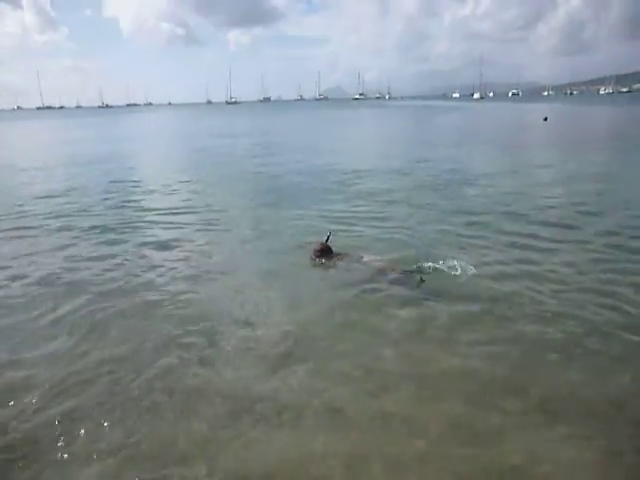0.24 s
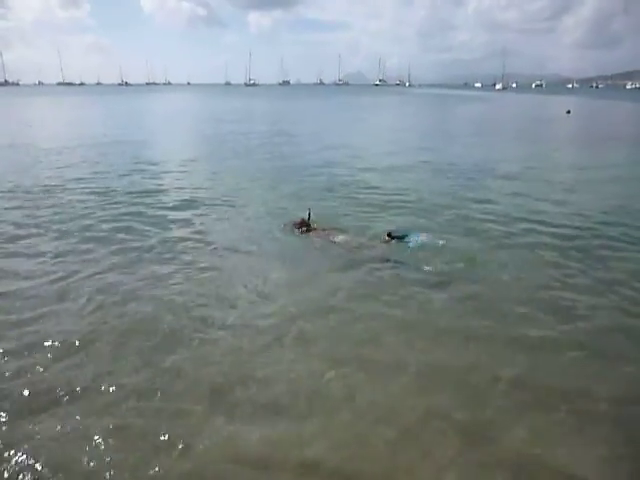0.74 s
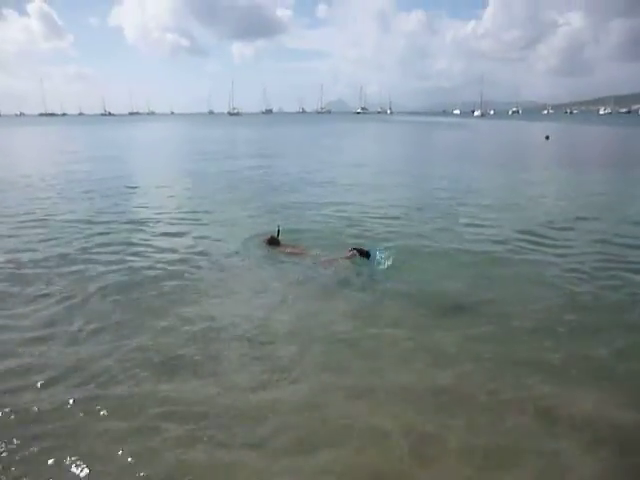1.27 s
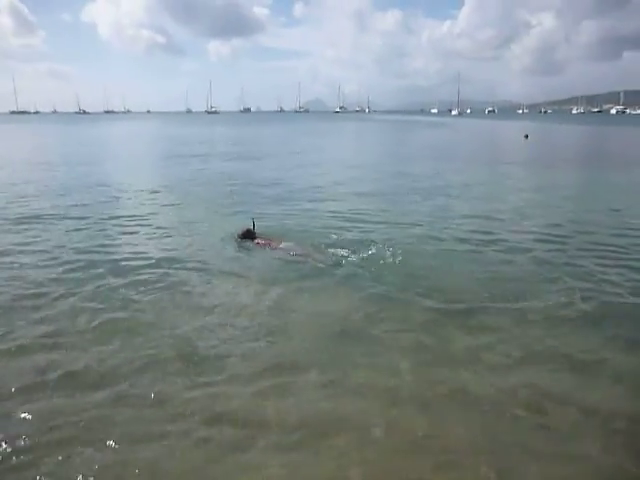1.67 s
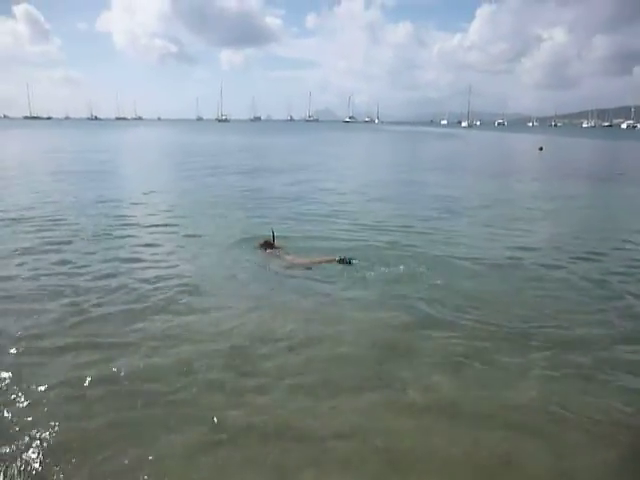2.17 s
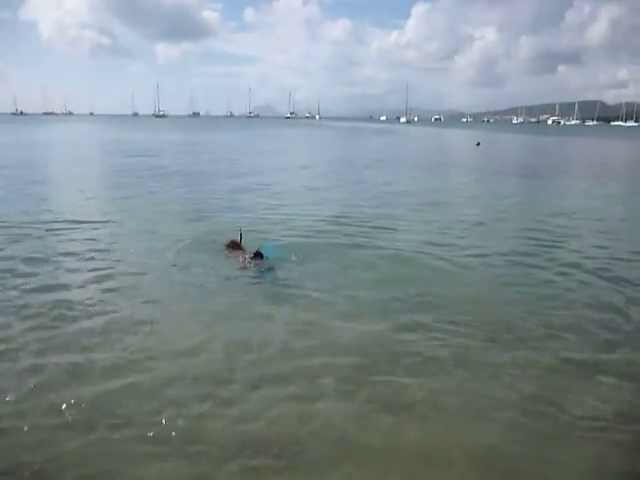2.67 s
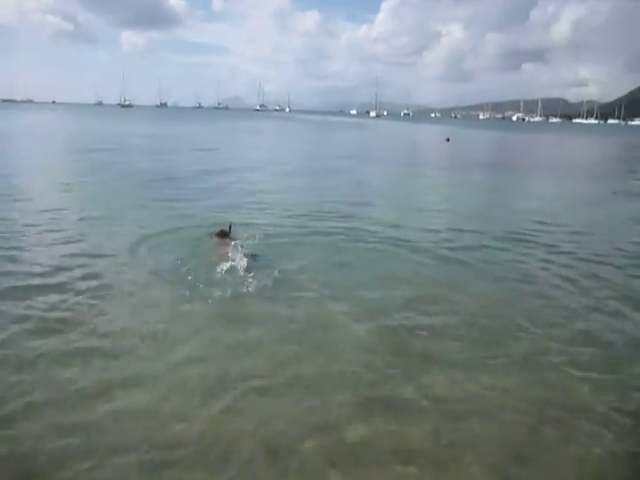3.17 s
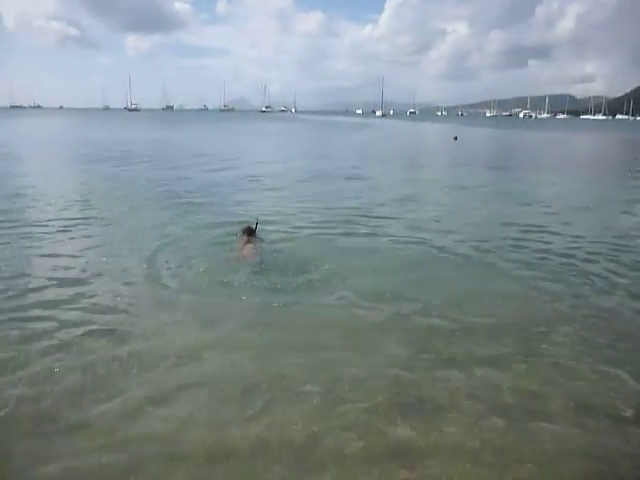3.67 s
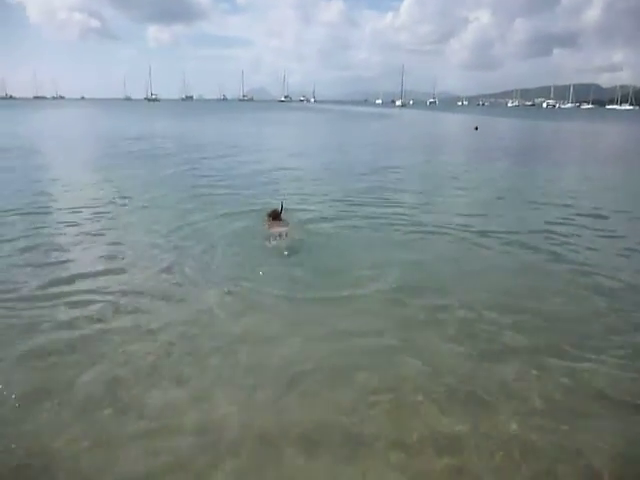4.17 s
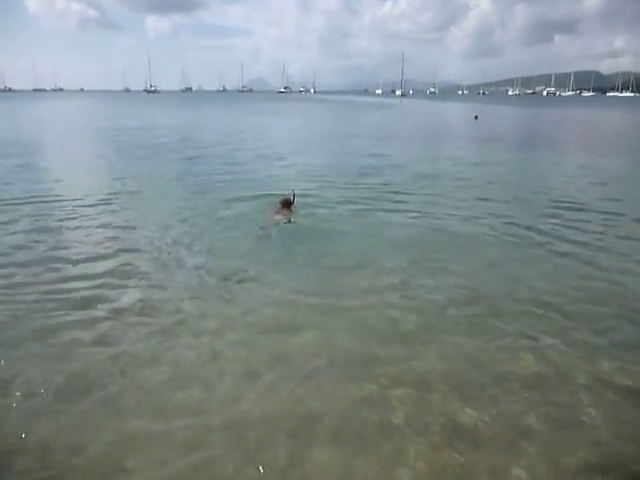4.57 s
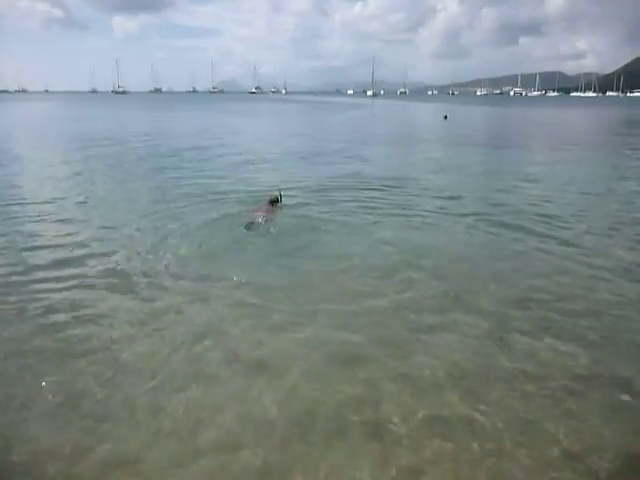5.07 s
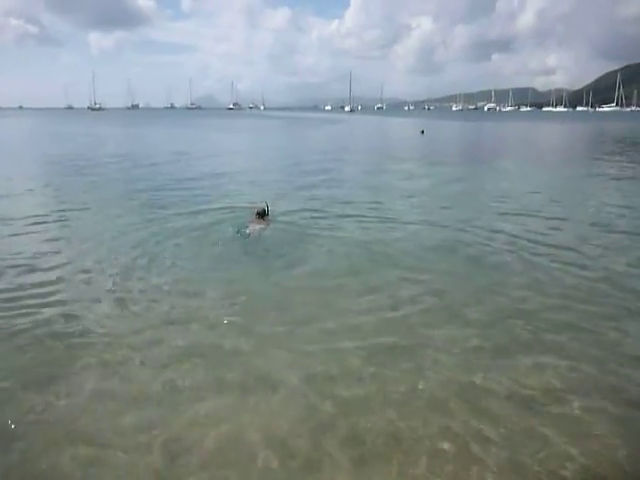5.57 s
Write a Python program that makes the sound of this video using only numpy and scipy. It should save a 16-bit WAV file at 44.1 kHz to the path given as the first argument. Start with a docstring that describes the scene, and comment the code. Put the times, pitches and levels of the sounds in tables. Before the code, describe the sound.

A small wave laps in, bubbling and gurgling, with a few round plops close by. It breaks about halfway through in a brief splash, spray ticks and crackling foam. Then the water recedes to a quieter trickle and rough, low wind blows batter one outdoor microphone in short bursts. The sound is dry, mono and without echo, its highest treble dulled.

```python
"""A small wave washes up a sheltered beach: decaying sine bubbles gurgle and splash, shaped noise and clicks fizz.
A few big bubbles plop close by as swelling sines of rising pitch; then the wave breaks amid ticks of spray.
As the water calms, gusts of low-pitched noise and single swinging eddies buffet the one microphone,
and the hardest blows make the camera turn its gain down for a moment.
Near the end a faint hollow tone, a wavering sine, sinks under the draining water."""
import sys
import numpy as np
from scipy.fft import rfft, irfft, next_fast_len
from scipy.io import wavfile
from scipy.ndimage import uniform_filter1d, minimum_filter1d, map_coordinates

SR = 44100
rng = np.random.default_rng(int(sys.argv[2]) if len(sys.argv) > 2 else 0)


def generate_wav(sig):
    """Save sig (samples, or channels by samples) to the path in sys.argv[1] as 16-bit PCM at SR."""
    pcm = np.round(np.clip(np.atleast_2d(sig).T, -1, 1) * 32767).astype(np.int16)
    wavfile.write(sys.argv[1], SR, pcm)


N = 256750

# strength and foaminess of the flow: (time [s], relative level [dB], foaminess [dB])
FLOW = [(0, -32, 0), (0.42, -31.5, -0.3), (0.6, -31, -2), (1.0, -30.5, -.5), (1.55, -30, -0.2),
        (1.92, -32.5, 0), (2.3, -31.5, 1), (3.15, -32, 2), (3.45, -33.5, 0.2), (4.05, -36.5, 0.5),
        (4.35, -41, 1.1), (4.65, -43.5, 1.5), (5.2, -42, 0.1), (5.82, -40, -3)]
# middle pitch of the bubbles in the wave front: (time [s], frequency [Hz])
FRONT_PITCH = [(0, 911), (1.5, 856), (2.3, 750), (2.9, 1025), (4.6, 1120), (5.82, 1002)]
# ripples that lap and trap air: (time [s], lift of the gurgle [dB])
LAPS_TRAPPING_AIR = [(.97, 2.5), (1.17, 2.5), (2.42, 2), (2.72, 4), (3.17, 3), (3.32, 3)]
# spectrum of the gurgling noise: (frequency [Hz], relative density [dB per Hz])
GURGLE_SPECTRUM = [(40, -38), (80, -35), (120, -14.5), (190, -16), (270, -5.5), (400, -3), (560, -4.5),
                   (800, -7.5), (1600, -56.5)]
# spectrum of the hissing foam, also the filter of its spray: (frequency [Hz], relative level [dB])
FOAM_SPECTRUM = [(300, -10), (800, 6), (1500, 3), (2100, 2), (3000, -2.5), (4500, -6), (6500, -11.5),
                 (9000, -13.5)]
# filter that colours the clicks of bursting films: (frequency [Hz], relative level [dB])
BURST_SPECTRUM = [(800, -7), (2500, -12), (5000, 8.5), (8000, 6)]
# wind between gusts: (time [s], relative level [dB])
BREEZE_LEVEL = [(0, -46.5), (1.1, -49.5), (2.0, -52), (3.0, -53), (3.6, -39), (4.22, -46.5), (4.55, -27.5),
                (4.75, -36), (5.3, -34.5), (5.82, -46)]
# gusts: (time of peak [s], relative level [dB], half-length [s])
GUST_SWELLS = [(2.738, -25, .022), (3.187, -33, 0.054), (3.388, -28, 0.032), (3.99, -30, 0.016),
               (4.404, -26, 0.019), (4.49, -21, .025), (4.612, -21.5, 0.031), (4.84, -25.5, 0.016),
               (4.982, -30, 0.022), (5.164, -22.5, 0.11), (5.433, -24.5, .025), (5.722, -35.5, 0.036)]
# spectrum of turbulence on the microphone: (frequency [Hz], relative density [dB per Hz])
BUFFET_SPECTRUM = [(12, -18.5), (30, -11.5), (55, -5), (95, -1), (180, 1.5), (300, -7.5), (450, -14),
                   (900, -35.5), (2500, -67.5)]
# the strongest eddies: (time of peak [s], relative level [dB], centre frequency [Hz])
STRONG_EDDIES = [(3.337, -11, 226), (3.99, -19.5, 150), (4.391, -15, 138), (4.408, -10, 119),
                 (4.449, -12, 140), (4.486, -9.5, 375), (4.502, -3.5, 257.5), (4.635, -13.5, 417),
                 (4.641, -6, 153.6), (5.001, -10.5, 125), (5.158, -12.5, 120), (5.257, -1, 162),
                 (5.501, -12.5, 186)]
# near bubbles: (time of onset [s], relative level [dB], frequency [Hz], time scale of the ring [s])
NEAR_BUBBLES = [(.772, -9, 775, 0.014), (1.510, -7, 850, 0.012), (1.704, -11, 1830, 0.01),
                (1.730, -12, 797, 0.045), (1.819, -14, 263, 0.019), (2.122, -14, 660, 0.019),
                (2.365, -7, 1040, 0.012), (2.926, -9.5, 720, 0.014), (2.998, -11, 944, 0.012),
                (4.128, -20, 468, 0.03), (4.458, -22, 1404, 0.018), (4.875, -7, 890, .009),
                (4.876, -15.5, 495, 0.01), (5.378, -20, 1460, 0.01)]
# drops slapping the surface: (time [s], relative level [dB])
DROPS = [(2.24, -20), (2.606, -21), (3.272, -20.5), (3.935, -25.5), (4.042, -18.5), (4.097, -25),
         (4.281, -28.5)]
# the camera's treble response: (frequency [Hz], level [dB])
TREBLE_RESPONSE = [(6500, 1.5), (7300, -4), (8200, -14), (8700, -27), (9100, -39.5)]

GURGLE_DB, SPLASH_DB, FIZZ_DB = -1.17, -2, -0.17  # each layer over the flow
FOAM_DAMPING = 0.7  # dB of splash lost for each dB of foaminess
LAP_S = 0.072  # half-length of a lap
POCKET_RATIO = 0.3907  # pitch of the big air pockets over that of the front
# as the wave breaks, its front splashes down, then the foam bursts
BREAK_S, SPLASH_AFTER_S, FIZZ_AFTER_S = 2.706, 0.13, 0.43
BREAK_SPLASH_DB, BREAK_SPLASH_S = 7.2, 0.22  # lift and half-length of the splash
BREAK_FIZZ_DB, BREAK_FIZZ_S = 3.8, 0.11  # lift and half-length of the fizz
FLUTTER_DB, FLUTTER_HZ = -14.5, 332  # level over the gusts, centre of the resonance
EDDY_CYCLES = 1.08  # half-length of an eddy
SPATTER_HZ, SPATTER_DECAY_S = 1850, 0.006  # centre and decay of each tick
HOLLOW_S, HOLLOW_LENGTH_S, HOLLOW_DB = 5.68, 0.11, -41.5  # middle, half-length, mean level
HOLLOW_HZ, HOLLOW_SAG_HZ_PER_S = 309, 150  # pitch at the middle, and how fast it sinks
CEILING_DB, SENSE_S, RECOVERY_DB_PER_S = -15, 0.004, 6.5  # gain control
TOP_HZ = 9100  # band limit


def amp(db):
    """A level in decibels is the logarithm of an amplitude ratio; this inverts it."""
    return 10 ** (np.asarray(db) / 20)


def unit(x):
    """Equal rms means equal mean power: x is scaled to rms 1."""
    return x / np.sqrt(np.mean(x ** 2) + 1e-20)


def curves(rows):
    """Linear interpolation gives one value per sample for each column after the time."""
    s, *columns = np.transpose(rows)
    return [np.interp(np.arange(N) / SR, s, column) for column in columns]


def wobble(rate):
    """Random knots, rate of them a second, joined by a spline give a smooth fluctuation."""
    knots = rng.standard_normal(int(N * rate / SR) + 4)
    return map_coordinates(knots, [np.arange(N) * rate / SR])


def swell(s, length):
    """A Gaussian envelope rises to 1 at time s and falls to 1/e a half-length away."""
    return np.exp(-((np.arange(N) / SR - s) / length) ** 2)


def filtered(x, response):
    """Linear filtering multiplies the spectrum of x by a response of frequency."""
    size = next_fast_len(N + SR // 2)
    return irfft(rfft(x, size) * response(np.fft.rfftfreq(size, 1 / SR)), size)[:N]


def coloured(x, spectrum):
    """A response interpolated on a log-frequency axis colours x, at rms 1."""
    f, db = np.transpose(spectrum)
    return unit(filtered(x, lambda hz: amp(np.interp(np.log(hz + 1), np.log(f), db))))


def noise(spectrum):
    """White noise takes the colour of its filter, at rms 1."""
    return coloured(rng.standard_normal(N), spectrum)


def resonant(x, centre_hz, sharpness, order):
    """A broad resonance weakens x on either side of its centre, at rms 1."""
    ratio = (np.fft.rfftfreq(x.shape[-1], 1 / SR) + 1) / centre_hz
    response = 1 / np.hypot(1, sharpness * (ratio - 1 / ratio)) ** order
    return unit(irfft(rfft(x) * response, x.shape[-1]))


def placed(starts, grains):
    """Superposition: the rows of grains add, each beginning at its time."""
    first = np.round(np.maximum(starts, 0) * SR).astype(int)
    index = first + np.arange(grains.shape[1])
    return np.bincount(index.ravel(), grains.ravel(), N)[:N]


def wash_levels():
    """The flow drives gurgle, splash and fizz; foam muffles the splash; laps and the break lift them in turn."""
    flow_db, foam_db = curves(FLOW)
    laps_db = sum(db * swell(s, LAP_S) for s, db in LAPS_TRAPPING_AIR)
    fall_db = BREAK_SPLASH_DB * swell(BREAK_S + SPLASH_AFTER_S, BREAK_SPLASH_S)
    burst_db = BREAK_FIZZ_DB * swell(BREAK_S + FIZZ_AFTER_S, BREAK_FIZZ_S)
    gurgle_db = flow_db + GURGLE_DB + laps_db
    splash_db = flow_db + SPLASH_DB - FOAM_DAMPING * foam_db + fall_db
    fizz_db = flow_db + FIZZ_DB + foam_db + burst_db
    return gurgle_db, splash_db, fizz_db


def bubbles(centre_hz, spread, cycles, scatter_db, rise, count, size):
    """Damped oscillators: each bubble rings a few cycles and climbs in pitch as it nears the surface; rms 1."""
    start = rng.uniform(0, N / SR, (count, 1))
    pitch, damping, strength = np.clip(rng.standard_normal((3, count, 1)), -2.3, 2.3)
    centre = np.broadcast_to(centre_hz, N)[(start * SR).astype(int)]
    hz = centre * np.exp(spread * pitch)
    turns = hz * np.arange(size) / SR
    age = turns / (cycles * np.exp(damping / 2))
    envelope = np.exp(-age) * (1 - np.exp(-2 * turns))
    ring = envelope * np.sin(2 * np.pi * turns * (1 + rise * age / (1 + age)))
    fade = 1 - np.linspace(0, 1, size) ** 2  # reaches zero at the end of the grain
    return unit(placed(start, amp(scatter_db * strength) * ring * fade))


def crackle(scatter_db, count):
    """Impulses have a flat spectrum: bare clicks of random sign and very uneven strength, at rms 1."""
    strength = np.minimum(rng.standard_normal((count, 1)), 2.5)
    sign = rng.choice([-1, 1], (count, 1))
    return unit(placed(rng.uniform(0, N / SR, (count, 1)), amp(scatter_db * strength) * sign))


def wash():
    """Bubble size sets pitch: big pockets gurgle, middling bubbles splash in the front, tiny ones burst in foam."""
    gurgle_db, splash_db, fizz_db = wash_levels()
    front_hz, = curves(FRONT_PITCH)
    pockets = bubbles(POCKET_RATIO * front_hz, spread=0.2433, cycles=4.3, scatter_db=2.5,
                      rise=0.077, count=1800, size=1800)
    gurgle = unit(pockets + amp(3) * noise(GURGLE_SPECTRUM))
    splash = bubbles(front_hz, spread=0.2686, cycles=3.3, scatter_db=2,
                     rise=0.087, count=6000, size=700)
    spray = bubbles(2647, spread=0.444, cycles=2.8, scatter_db=6.5,
                    rise=0.057, count=7000, size=300)
    # bursting films click above the hiss of the foam
    clicks = coloured(crackle(scatter_db=7.0, count=2600), BURST_SPECTRUM)
    bursts = clicks * amp(3.5 * wobble(14))
    hiss = noise(FOAM_SPECTRUM)
    foam = unit(hiss + amp(-6.5) * coloured(spray, FOAM_SPECTRUM) + amp(-13.5) * bursts)
    return (amp(gurgle_db + 0.6 * wobble(8.3)) * gurgle
            + amp(splash_db + 0.9 * wobble(14)) * splash
            + amp(fizz_db + 0.76 * wobble(30)) * foam)


def eddies():
    """Pressure swings in a Gaussian burst: each strong eddy shoves the diaphragm back and forth."""
    s, db, hz = np.transpose(STRONG_EDDIES)[:, :, None]
    t = np.arange(-SR // 20, SR // 20) / SR
    # random phase makes each eddy swing unevenly about its own pitch
    churn = np.array([wobble(2 * pitch)[:len(t)] for pitch in hz[:, 0]])
    swing = np.sin(2 * np.pi * (hz * t + rng.random(s.shape)) + churn)
    envelope = np.exp(-(t * hz / EDDY_CYCLES) ** 2)
    return placed(s + t[0], amp(db - 6) * envelope * swing)


def wind():
    """Turbulent pressure rumbles on the microphone; only the gusts carry a rough flutter, and eddies add blows."""
    breeze_db, = curves(BREEZE_LEVEL)
    gusts = sum(amp(db) * swell(s, length) for s, db, length in GUST_SWELLS)
    strength = np.hypot(amp(breeze_db + 1.7 * wobble(8.3)), gusts)  # powers add
    rumble = strength * unit(noise(BUFFET_SPECTRUM) * amp(1.6 * wobble(45)))
    rough = resonant(rng.standard_normal(N), FLUTTER_HZ, sharpness=1.5, order=2)
    flutter = amp(FLUTTER_DB) * gusts * unit(rough * amp(3 * wobble(60)))
    return amp(-1) * rumble + flutter + eddies()


def plops():
    """Volume oscillation: single near bubbles swell as they pinch off, then ring out with rising pitch."""
    s, db, hz, life = np.transpose(NEAR_BUBBLES)[:, :, None]
    age = np.arange(SR // 8) / SR / life
    envelope = np.sqrt(age) * np.exp(-2 * age ** 2)
    # the pitch passes its listed value at age 0.4
    rising_hz = hz * (1 + 0.23 * np.minimum(age - 0.4, 1))
    phase = 2 * np.pi * np.cumsum(rising_hz, axis=1) / SR
    return placed(s, amp(db - 5.0) * envelope * np.sin(phase))


def spatter():
    """Impact noise: each drop lands with a short wet tick, resonant noise that decays exponentially."""
    s, db = np.transpose(DROPS)[:, :, None]
    t = np.arange(SR // 40) / SR
    tick = resonant(rng.standard_normal((len(s), len(t))), SPATTER_HZ, sharpness=2.6, order=1)
    return placed(s, amp(db - 6.5) * tick * np.exp(-t / SPATTER_DECAY_S))


def hollow():
    """Frequency modulation: a faint sine wavers and sinks in pitch."""
    hz = HOLLOW_HZ - HOLLOW_SAG_HZ_PER_S * (np.arange(N) / SR - HOLLOW_S)
    level = amp(HOLLOW_DB + 1.5 * wobble(30)) * swell(HOLLOW_S, HOLLOW_LENGTH_S)
    return level * np.sin(2 * np.pi * np.cumsum(hz) / SR + 0.4 * wobble(45))


def scene():
    """Superposition in the open: water and wind add, with nothing to echo from."""
    return (wash() + wind() + plops() + spatter() + hollow())[None]


def gain_control(x):
    """Compression: a short-term level over the ceiling lowers the gain at once; it recovers at a steady rate."""
    size = int(SENSE_S * SR)
    level_db = 10 * np.log10(np.abs(uniform_filter1d(x ** 2, size)) + 1e-12)
    needed_db = minimum_filter1d(np.minimum(0, CEILING_DB - level_db), size)
    # a running minimum under a rising ramp holds each cut and lets it creep back
    recovered_db = RECOVERY_DB_PER_S * np.arange(N) / SR
    gain_db = np.minimum.accumulate(needed_db - recovered_db) + recovered_db
    return x * amp(uniform_filter1d(gain_db, size))


def record(dry):
    """Band limiting: the camera rides its gain, adds a small steady offset and rolls off the treble."""
    def response(hz):
        return amp(np.interp(hz, *np.transpose(TREBLE_RESPONSE))) * (hz < TOP_HZ)

    return filtered(gain_control(dry[0]) + 0.0055, response)[None]


dry = scene()
out = record(dry)
generate_wav(out)
```